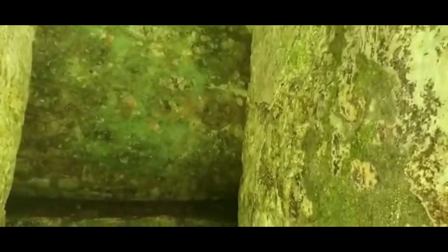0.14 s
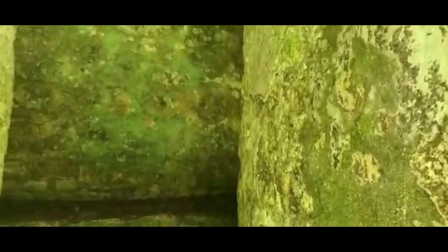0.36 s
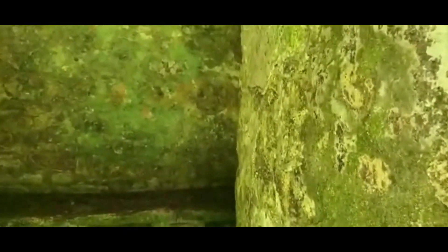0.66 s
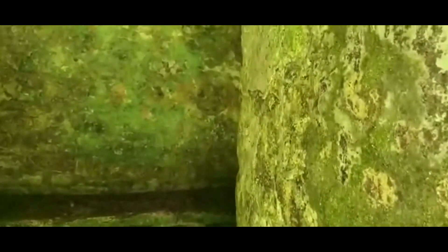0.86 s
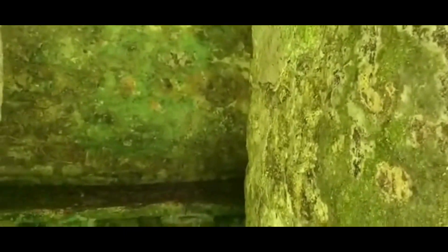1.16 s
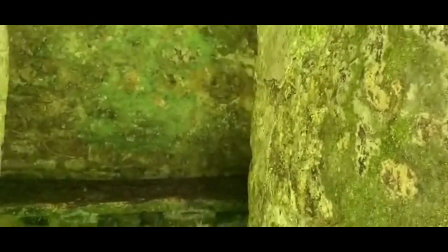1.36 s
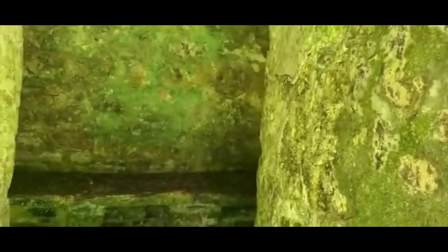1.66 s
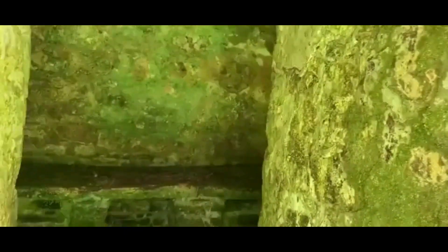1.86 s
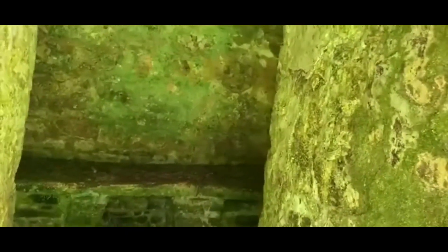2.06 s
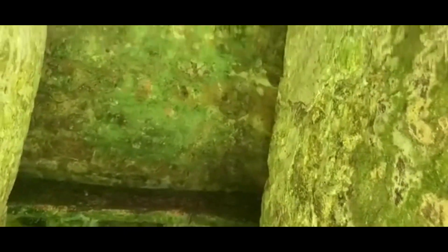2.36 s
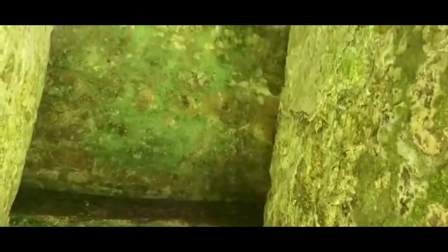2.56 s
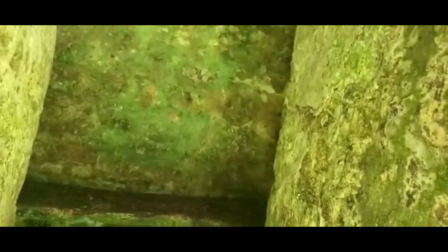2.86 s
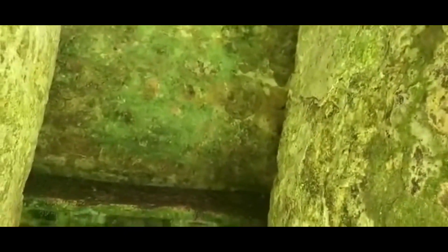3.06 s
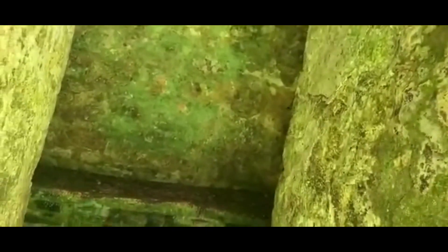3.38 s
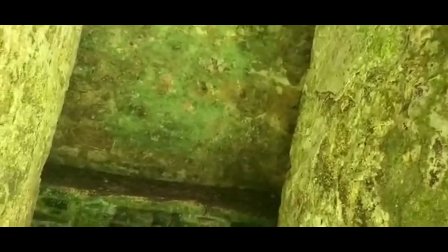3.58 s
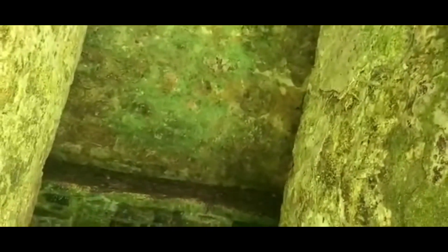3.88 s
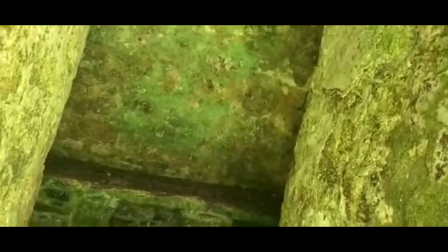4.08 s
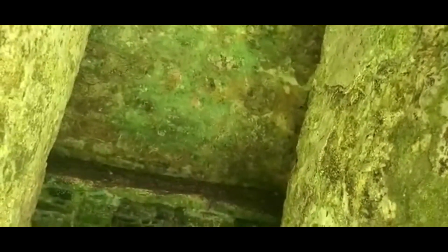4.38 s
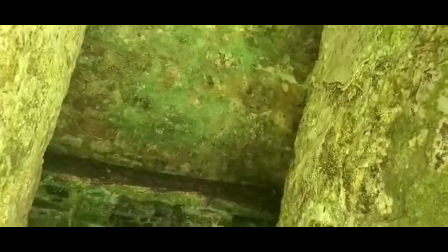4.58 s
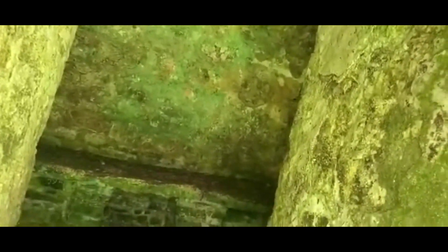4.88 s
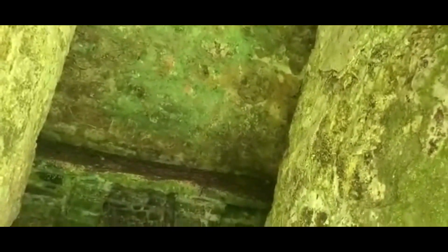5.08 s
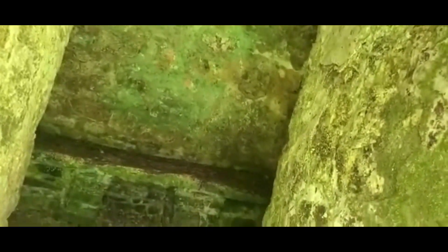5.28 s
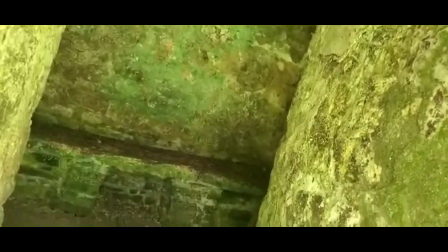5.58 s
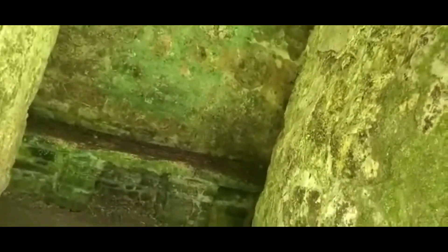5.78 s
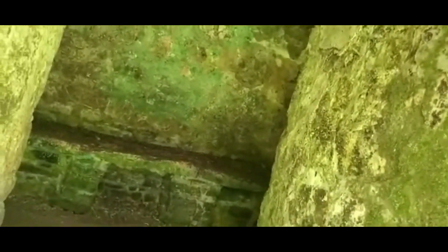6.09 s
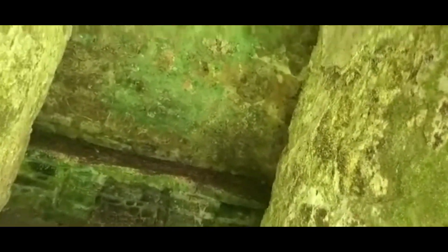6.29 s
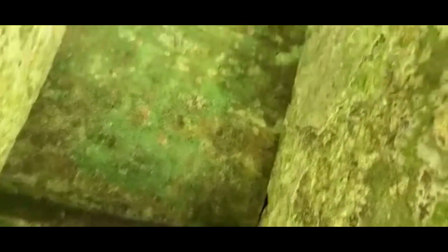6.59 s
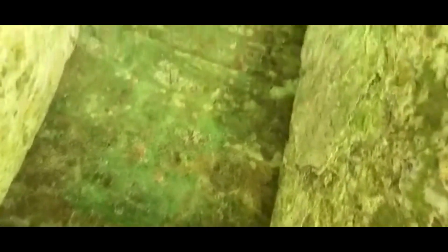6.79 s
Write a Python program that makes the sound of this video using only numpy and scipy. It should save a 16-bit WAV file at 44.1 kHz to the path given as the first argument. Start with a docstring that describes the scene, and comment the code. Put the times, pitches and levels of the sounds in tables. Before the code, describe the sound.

Soft handling thumps and a dry click give way to a faint forest background of high, pulsing insect rasp and thin cricket hum. Far birds give brief slurred calls and whistles with a little echo, and feet shift gently on leaf litter. The rustling dies away and a low rumble rises briefly. Finally fingers knock hard against the microphone in two quick clusters, close and mostly on the right.

```python
"""A quiet jungle around a hand-held camera. Throughout, insects pulse in the high treble over a thin
cricket tone. At first fingers bump the body lightly by its right microphone, amid dry clicks and rustling
leaves. From 1.2 s far birds slur and whistle, smeared by the trees; feet scuff and a near insect zips.
By 5 s the rustle has died and a low rumble swells. From 6.4 s the fingers bump hard, ringing the case."""
import sys
import numpy as np
from scipy import signal
from scipy.fft import rfft, irfft
from scipy.io import wavfile

SR = 44100
rng = np.random.default_rng(int(sys.argv[2]) if len(sys.argv) > 2 else 0)


def unload_audio(sound):
    """Save the sound as a 16-bit wav file, at the path given as the first command line argument."""
    columns = np.transpose(np.atleast_2d(sound))
    # keep every value between -1 and 1, then stretch to whole-number steps
    steps = np.round(np.clip(columns, -1, 1) * 32767)
    wavfile.write(sys.argv[1], SR, steps.astype(np.int16))


N = 306098
TIME = np.arange(N) / SR


# Finger contacts. Each row: start in seconds, level in dB, softness from 0 to 1.
BUMPS = [(.047, -37, 1), (0.085, -45, 0.05), (0.137, -25.5, 0.61), (.301, -40.5, 0.97), (0.877, -48, 0.53),
         (1.77, -55.5, 1), (2.671, -52.5, 0.48), (3.505, -55, 0.95), (6.388, -27, 0.45),
         (6.3938, -17, 0.23), (6.407, -31, 0.22), (6.467, -31, .8), (6.769, -32.5, 0.92), (6.7941, -19, 0),
         (6.873, -25, 0.38)]
# Hardest contacts, on the shell. Each row: start in seconds, level in dB.
TAPS = [(.087, -38.5), (6.387, -30), (6.3943, -12), (6.4074, -21.5), (6.7945, -15.5)]
# Modes of hand and camera (thud), case (knock) and shell (tick).
# Each row: base frequency in Hz, relative level in dB, T60 in seconds.
THUD_MODES = [(62, 5, 0.12), (88.3, 12, 0.065)]
KNOCK_MODES = [(223, 9, 0.028), (326, 7, 0.019), (590, -5.5, 0.018)]
TICK_MODES = [(1034, -10.5, 0.012), (1277, -12.5, 0.0094), (1800, -1, 0.0031), (3940, -11, 0.0012)]

def finger_bumps(hard_pitch_ratio=1.115, soft_sag=.45, soft_knock_db=-28.5, case_cutoff_hz=3300):
    """Bumps reach mostly the right microphone, dulled by the case; soft ones are lower and knock less."""
    thud_sides, case_sides = from_db([[-18], [0]]), from_db([[-11], [0]])
    out = sum(strike(TICK_MODES, at, db, rise_s=.00024) for at, db in TAPS) * case_sides
    for at, db, softness in BUMPS:
        ratio = hard_pitch_ratio - soft_sag * softness ** 3
        out += strike(THUD_MODES, at, db, ratio, rise_s=.0085) * thud_sides
        out += strike(KNOCK_MODES, at, db + soft_knock_db * softness, ratio, rise_s=.0028) * case_sides
    return butter(out, case_cutoff_hz, "low")


# Grip rumble spectrum. Each row: frequency in Hz, left and right relative level in dB.
GRIP_SPECTRUM = [(22.5, -31, -9), (48.3, -10.5, 4), (83.3, -2, 1.5), (149, -12.5, -16), (292, -21, -26),
                 (790, -50, -50), (3000, -86, -94)]

def grip(rise_s=.04, decay_s=.26, slide_s=.11):
    """The hand rumbles, more around each bump; the fingertip slides on. One swell fills both sides."""
    resting = from_db(-77 + 1.5 * drift(1.9))
    shifts = [from_db(-42 + .55 * db) * np.exp(-np.maximum((at - TIME) / rise_s, (TIME - at) / decay_s))
              for at, db, _ in BUMPS]
    hand = np.hypot(resting, np.max(shifts, axis=0)) * from_db([[-14], [0]])
    rumble = np.hypot(hand, held(at=4.716, length_s=1, db=-63) * pan(-1.5))
    sliding = sum(swell(at, slide_s, db - 43, rise_share=.42) for at, db, _ in BUMPS)
    hiss = unit_rms(butter(rng.standard_normal((2, N)), [250, 2600], "band"))
    return unit_rms(coloured_noise(GRIP_SPECTRUM)) * rumble + hiss * sliding * pan(-1)


# Insect rasp spectrum. Each row: frequency in Hz, left and right base density in dB per Hz.
RASP_SPECTRUM = [(5800, -135, -135), (6403, -108.8, -104.0), (7170, -106.3, -98), (7900, -114.0, -105.1),
                 (9870, -108.4, -105.6), (11270, -101.1, -91.5), (12620, -101.1, -96),
                 (13560, -107.7, -103.2), (15000, -110.9, -109.2), (18900, -117.1, -116.1)]
# Chorus strength. Each row: time in seconds, gain in dB.
RASP_GAIN = [(0, 3), (1.2, 0.2), (6.9, 0.03)]
# Chorus tempo. Each row: time in seconds, pulses per second.
PULSE_RATE = [(0, 8.1), (2, 7.7), (3.4, 7.95), (5.3, 8.85), (6.9, 8.1)]

def insect_chorus(depth_db=2.5, flutter_db=.4, first_crest_s=.079):
    """Insects rasp in step; close reflections off the trunks ripple the spectrum."""
    cycles = np.cumsum(np.interp(TIME, *np.transpose(PULSE_RATE))) / SR
    cycles -= np.interp(first_crest_s, TIME, cycles)
    flutter = narrow_noise(7.7, width_hz=48)[0]
    pulse = from_db(depth_db * np.cos(2 * np.pi * cycles) + flutter_db * flutter)
    rasp = coloured_noise(RASP_SPECTRUM) * pulse * gain_curve(RASP_GAIN)
    return trunk_scatter(rasp, t60_s=.07, direct_db=8)


# Wing strokes. Each row: start in seconds, level in dB.
ZIPS = [(1.97, -53.5), (2.423, -53.5), (3.526, -54.5)]
# Stroke spectrum. Each row: frequency in Hz, left and right relative level in dB.
ZIP_SPECTRUM = [(9000, -15, -33), (11400, -1, 4), (14000, -4, -3), (16300, -9, -8)]

def insect_zips(length_s=.054):
    """A nearer insect makes single, very high wing strokes."""
    strokes = sum(swell(at, length_s, db, rise_share=.074) for at, db in ZIPS)
    return unit_rms(coloured_noise(ZIP_SPECTRUM)) * strokes


# Falling slurs. Each row: start in seconds, pitch in Hz, level in dB.
SLURS = [(1.25, 4303, -67), (3.559, 4385, -68), (5.869, 4340, -67.5)]
# Harsh flurry. Each row: start and length in seconds, pitch in Hz, level in dB, fall and waver shares.
FLURRY = [(2.068, .04, 4980, -64.5, 0.1, 0.022), (2.11, 0.086, 4720, -62, 0.31, 0.094),
          (2.161, 0.18, 3935, -61.5, -0.0066, .09), (2.242, .15, 5070, -66.5, -.018, .015)]
# Arched whistles. Each row: start and length in seconds, pitch in Hz, level and pan in dB, arch share.
HIGH_WHISTLES = [(2.644, 0.33, 6700, -64.5, -2.5, 0.022), (4.535, .37, 6940, -59, -2.5, 0.033),
                 (5.579, .42, 7390, -66.5, -10, .055), (6.44, 0.36, 7480, -64.5, -6, 0.061)]
# Plain whistles. Each row: start and length in seconds, pitch in Hz, level and pan in dB.
FAR_WHISTLES = [(4.118, 0.19, 1893, -71.5, -7), (5.14, 0.16, 2062, -66, -9), (5.591, 0.38, 1708, -74.5, -5),
                (6.51, .3, 1845, -70.5, -5.5)]
# Low hoots. Each row: start and length in seconds, level in dB.
HOOTS = [(1.288, 0.13, -73.5), (4.491, 0.074, -76), (5.82, .15, -76)]

def birds(slur_s=.16, hoot_hz=684):
    """Five kinds of call, smeared by the trees."""
    slurs = sum(bird_note(at, slur_s, hz, db, pan_db=-7, fall=.09, arch=.0114, waver=.047)
                for at, hz, db in SLURS)
    flurry = sum(bird_note(*note, pan_db=-5.5, fall=fall, arch=.0248, waver=waver)
                 for *note, fall, waver in FLURRY)
    high = sum(bird_note(*note, fall=-.00777, arch=arch, waver=.49 * arch)
               for *note, arch in HIGH_WHISTLES)
    far = sum(bird_note(*note, fall=.0199, arch=.0035, waver=.034) for note in FAR_WHISTLES)
    hoots = sum(bird_note(at, length_s, hoot_hz, db, pan_db=0, fall=.053, arch=.035, waver=.083)
                for at, length_s, db in HOOTS)
    return (trunk_scatter(slurs + flurry, t60_s=1.07, direct_db=-8)
            + trunk_scatter(high, t60_s=.91, direct_db=-5.5)
            + trunk_scatter(far + hoots, t60_s=.85, direct_db=-5))


def bird_note(at, length_s, hz, db, pan_db, fall, arch, waver):
    """A sine glides, arches and wavers by shares of its middle pitch; fast wavering makes it harsh."""
    out, span = np.zeros(N), (TIME >= at) & (TIME < at + length_s)
    position = np.linspace(-1, 1, span.sum())
    wobble = unit_rms(butter(rng.standard_normal(SR), [90, 220], "band"))[-len(position):]
    pitch_hz = hz * (1 - fall * position - arch * position ** 2 + waver * wobble)
    envelope = signal.windows.tukey(len(position), .35)
    out[span] = np.sqrt(2) * np.sin(2 * np.pi * np.cumsum(pitch_hz) / SR) * envelope
    return out * from_db(db) * pan(pan_db)


# Cricket tone strength. Each row: time in seconds, relative level in dB.
CRICKET_GAIN = [(0.25, -73.5), (1.57, -81), (1.8, -76), (5.51, -73), (6.11, -73)]
# Phrases of the higher kind. Each row: start and length in seconds, level in dB.
CRICKET_PHRASES = [(3.436, 0.98, -80), (4.9, 0.94, -88), (5.753, 0.86, -78)]

def crickets():
    """Many far crickets merge into one thin tone with a ragged skirt; another kind sings higher."""
    tone = narrow_noise(2200, width_hz=11.2)
    skirt = from_db(-1.5) * narrow_noise(2216, width_hz=207)
    higher = narrow_noise(4150, width_hz=20) * sum(held(*phrase) for phrase in CRICKET_PHRASES)
    return ((tone + skirt) * gain_curve(CRICKET_GAIN) * from_db(2.5) + higher) * pan(-5)


# Dry clicks. Each row: start in seconds, level in dB.
CLICKS = [(0.018, -53), (0.537, -57), (0.5401, -45.5)]
# Click resonances. Each row: frequency in Hz, relative level in dB, T60 in seconds.
CLICK_MODES = [(1270, -4, 0.019), (2080, 0, 0.006), (3350, 3, 0.007)]

def dry_clicks(band_hz=(1050, 4000)):
    """Small dry clicks, like a lip smack: three brief resonances, no bass, a dull top."""
    clicks = butter(sum(strike(CLICK_MODES, at, db) for at, db in CLICKS), band_hz, "band")
    return trunk_scatter(clicks * pan(-2), t60_s=.4, direct_db=7)


# Foot scuffs. Each row: start and length in seconds, level in dB.
SCUFFS = [(1.325, 0.18, -67), (3.053, 0.097, -62), (3.251, 0.11, -65), (3.53, 0.033, -71),
          (3.58, 0.096, -68), (5.875, 0.099, -68.5)]
# Scuff spectrum. Each row: frequency in Hz, left and right relative level in dB.
SCUFF_SPECTRUM = [(103, -34, -6), (298, -7, -9.5), (680, -7, -2), (1190, -12, -29), (2500, -34, -30),
                  (9000, -61, -36)]

def foot_scuffs():
    """Feet shift softly on the leaf litter."""
    return unit_rms(coloured_noise(SCUFF_SPECTRUM)) * sum(swell(*scuff) for scuff in SCUFFS)


# Leaf spectrum. Each row: frequency in Hz, left and right relative level in dB.
LEAF_SPECTRUM = [(150, 4, 6), (540, 12, 12), (1280, 11, 6.5), (2630, 7.5, 11.5), (5300, -5, 1),
                 (9050, -57, -45), (16000, -35, -24)]
# Faint rustle. Each row: time in seconds, level in dB.
RUSTLE_LEVEL = [(0, -71.5), (1.7, -78.5), (2.4, -74.5), (3.9, -72.5), (5, -95.5), (6.9, -105)]
# Nearby stirs. Each row: start and length in seconds, level in dB.
STIRS = [(2.198, 0.33, -71.5), (3.13, 0.23, -71), (3.33, 0.089, -70), (3.582, 0.13, -73)]

def leaves():
    """Leaves rustle, stir nearby and settle."""
    stirs = sum(swell(*stir, rise_share=.58) for stir in STIRS)
    return unit_rms(coloured_noise(LEAF_SPECTRUM)) * (gain_curve(RUSTLE_LEVEL) + stirs)


def drone():
    """A thin, low, far tone comes and goes."""
    return narrow_noise(383, width_hz=23) * held(at=.33, length_s=2.16, db=-86)


# Air spectrum. Each row: frequency in Hz, left and right density in dB per Hz.
AIR_SPECTRUM = [(25.6, -111.6, -99.8), (64, -100, -88), (138, -106, -103), (186, -104, -100),
                (420, -108.9, -107.7), (790, -110.6, -110.2), (1110, -102.2, -112.7),
                (1900, -102.4, -105.7), (2350, -100.9, -99.0), (2200, -107.9, -105.0),
                (2900, -110.4, -112.4), (3600, -109.5, -107.8), (4330, -108.0, -110.3),
                (4980, -119.3, -121.6), (15800, -112, -112)]

def forest_air():
    """Steady hush of still air."""
    return coloured_noise(AIR_SPECTRUM)


def trunk_scatter(x, t60_s, direct_db):
    """Trunks scatter a sound into a dying tail, different on each side; energy is kept."""
    t = TIME[:2 * SR]
    echoes = rng.standard_normal((2, len(t))) * from_db(-60 * t / t60_s)
    echoes /= np.sqrt(np.sum(echoes ** 2, axis=1, keepdims=True))
    echoes[:, 0] += from_db(direct_db)
    return signal.fftconvolve(x, echoes, axes=1)[:, :N] / np.hypot(1, from_db(direct_db))


def strike(modes, at, db, pitch_ratio=1, rise_s=.0001):
    """Damped sines from one blow; soft contact rounds the start, alternating signs build the swing."""
    out, start = np.zeros(N), int(at * SR)
    t = TIME[:min(SR // 2, N - start)]
    swing = sum((-1) ** k * from_db(mode_db - 60 * t / t60_s) * np.sin(2 * np.pi * hz * pitch_ratio * t)
                for k, (hz, mode_db, t60_s) in enumerate(modes))
    out[start:start + len(t)] = from_db(db) * swing * (1 - np.exp(-t / rise_s))
    return out


def coloured_noise(spectrum):
    """Stereo noise with its own spectrum on each side."""
    hz, *sides = np.transpose(spectrum)
    log_hz = np.log(np.fft.rfftfreq(N, 1 / SR) + 1e-3)
    gains = from_db([np.interp(log_hz, np.log(hz), side) for side in sides])
    return irfft(rfft(rng.standard_normal((2, N))) * gains * np.sqrt(SR / 2), N)


def narrow_noise(hz, width_hz):
    """Stereo noise twice through one resonance: a wavering tone of rms 1."""
    radius = np.exp(-np.pi * width_hz / SR)
    section = [1, 0, -1, 1, -2 * radius * np.cos(2 * np.pi * hz / SR), radius ** 2]
    return unit_rms(signal.sosfilt([section, section], rng.standard_normal((2, N + SR)))[:, SR:])


def drift(corner_hz):
    """Slow random wander of rms 1."""
    hz = np.fft.rfftfreq(N, 1 / SR)
    return unit_rms(irfft(rfft(rng.standard_normal(N)) * (hz > 0) / (1 + (hz / corner_hz) ** 4), N))


def swell(at, length_s, db, rise_share=.2):
    """Triangular gain envelope."""
    return from_db(db) * np.interp(TIME, [at, at + length_s * rise_share, at + length_s], [0, 1, 0])


def held(at, length_s, db, fade_share=.16):
    """Gain with attack, hold and release."""
    inside_s = np.minimum(TIME - at, at + length_s - TIME)
    return from_db(db) * np.clip(inside_s / (fade_share * length_s), 0, 1)


def gain_curve(rows):
    """Gain over time from rows of seconds and dB."""
    return from_db(np.interp(TIME, *np.transpose(rows)))


def pan(db):
    """Stereo gains for left minus right in dB."""
    return from_db([[db / 2], [-db / 2]])


def butter(x, hz, kind):
    """Second-order Butterworth filter."""
    return signal.sosfilt(signal.butter(2, hz, kind, fs=SR, output="sos"), x)


def from_db(db):
    """Decibels to gain."""
    return 10 ** (np.asarray(db) / 20)


def unit_rms(x):
    """Scale to rms 1."""
    return x / np.sqrt(np.mean(x ** 2) + 1e-30)


def scene():
    """The forest all round, and the hand on the camera."""
    forest = forest_air() + insect_chorus() + insect_zips() + crickets() + birds()
    return forest + dry_clicks() + foot_scuffs() + leaves() + drone() + grip() + finger_bumps()


def record(dry, bass_hz=30, top_hz=16500):
    """Gentle bass roll-off, steep top cut."""
    top_cut = signal.ellip(12, .1, 70, top_hz, fs=SR, output="sos")
    return signal.sosfilt(top_cut, butter(dry, bass_hz, "high"))


dry = scene()
out = record(dry)
unload_audio(out)
```